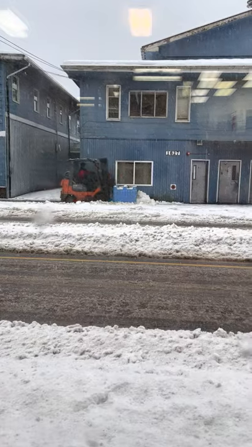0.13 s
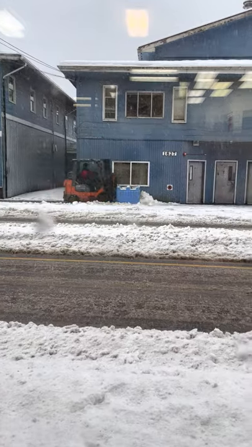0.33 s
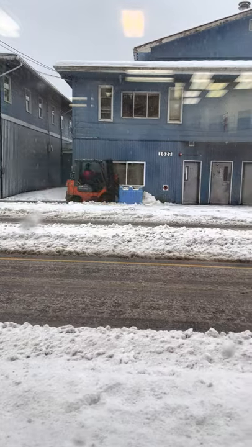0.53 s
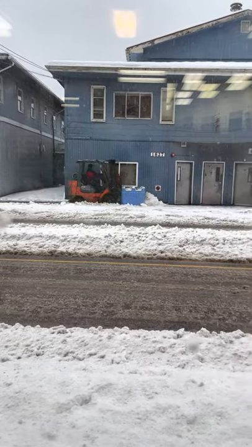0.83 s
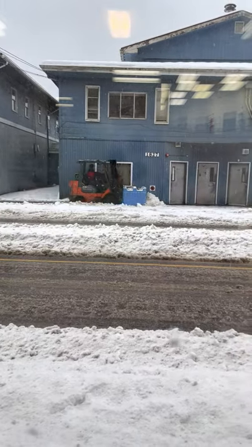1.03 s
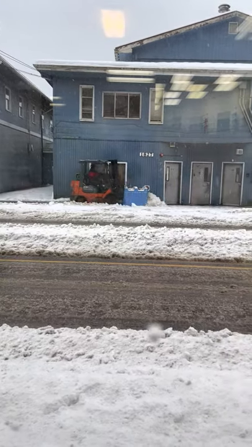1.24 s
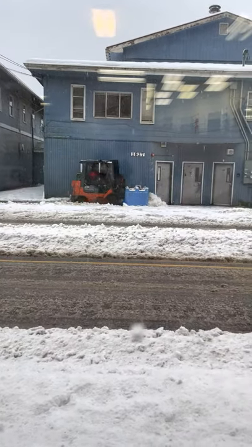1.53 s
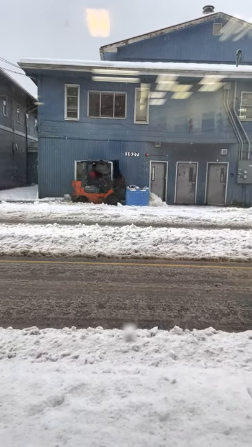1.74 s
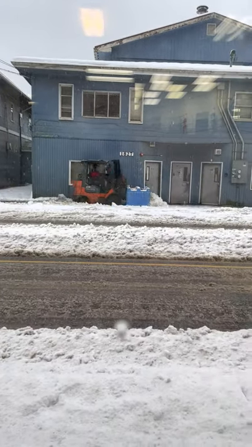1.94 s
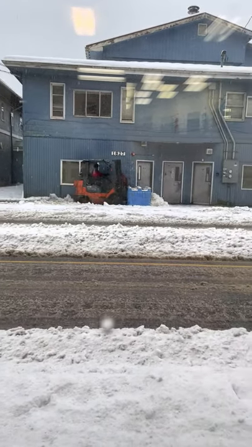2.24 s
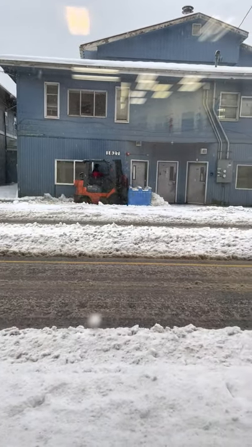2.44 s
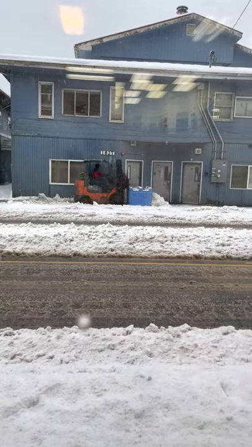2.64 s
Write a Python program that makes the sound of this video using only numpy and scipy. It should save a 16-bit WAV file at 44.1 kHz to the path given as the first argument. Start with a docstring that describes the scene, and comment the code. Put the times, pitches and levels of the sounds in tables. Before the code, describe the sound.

A forklift's low engine rumble throbs continuously outside, muffled by window glass, with faint dull bumps, wavering hums and thin airy hiss; a soft whine and hiss swell near the end, picked up by a handheld microphone indoors.

```python
"""Indoors at a window over a snowy street, where a forklift works its way across.
Its engine is a train of uneven firing pulses over a throbbing noise rumble; wavering sines make the hums,
the gliding growl and a late whine; bumps ring low damped modes.
Banded noise makes a thin hiss with a late swell and three faint swishes; narrow noise sings and ticks in it."""
import sys
import numpy as np
from scipy import signal
from scipy.fft import rfft, irfft, next_fast_len
from scipy.io import wavfile

SR = 44100
rng = np.random.default_rng(int(sys.argv[2]) if len(sys.argv) > 2 else 0)


def unload_wav(signal):
    """Save mono or channel-first audio to the path in sys.argv[1] as 16-bit WAV at rate SR, clipped to [-1, 1]."""
    wavfile.write(
        sys.argv[1],
        SR,
        np.round(np.clip(np.atleast_2d(signal).T, -1, 1) * 32767).astype(np.int16),
    )


N = 123039
T = np.arange(N) / SR


def from_db(db):
    """Decibels to amplitude gain."""
    return 10 ** (np.asarray(db) / 20)


def rms_one(x):
    """Scale to unit power."""
    return x / np.sqrt(np.mean(x ** 2) + 1e-20)


def in_time(rows, axis=1):
    """One column of a time table, joined by straight lines."""
    rows = np.array(rows)
    return np.interp(T, rows[:, 0], rows[:, axis])


def at_hz(points, hz):
    """Read a table on a log-frequency axis."""
    points = np.array(points)
    return np.interp(np.log(hz), np.log(points[:, 0]), points[:, 1])


def drift(rate_hz):
    """Slow random wander of spread 1: noise through a two-pole lowpass, run at every 40th sample."""
    step = 40
    pole = np.exp(-2 * np.pi * step * rate_hz / SR)
    noise = rng.standard_normal(N // step + 2002)
    slow = signal.lfilter([1], [1, -2 * pole, pole * pole], noise)[2000:]  # drop the filter's start-up
    slow = rms_one(slow - slow.mean())
    return np.interp(np.arange(N) / step, np.arange(len(slow)), slow)


def tone(hz):
    """A sine of rms 1 that follows a pitch curve."""
    cycles = np.cumsum(hz) / SR + rng.random()
    return np.sqrt(2) * np.sin(2 * np.pi * cycles)


def ring(x, hz, t60_s):
    """Two-pole resonance: a unit click sets a damped sine of height 1 ringing."""
    radius = np.exp(-np.log(1000) / (t60_s * SR))
    angle = 2 * np.pi * hz / SR
    return signal.lfilter([0, np.sin(angle)], [1, -2 * radius * np.cos(angle), radius ** 2], x + 1e-18)


def narrow_noise(hz, width_hz):
    """Noise twice through one resonance of the given width; rms 1."""
    t60_s = np.log(1000) / (np.pi * width_hz)
    once = ring(rng.standard_normal(N), hz, t60_s)
    return rms_one(ring(once, hz, t60_s))


def banded_noise(spectrum, patchy_db):
    """Third-octave bands of stereo noise, each with its own level, flicker and left-right likeness; rms 1."""
    # left-right correlation: hz, likeness (1 = identical)
    likeness = [(60, 1), (180, .9999), (350, .98), (700, 0.72), (1150, 0.62), (1800, 1), (3000, 0.52),
                (4500, 0.78), (6000, 0.91), (7600, 1), (9000, 1), (11000, 0.95)]
    edges_hz = 20 * 2 ** (np.arange(29) / 3)
    white = rng.standard_normal((2, 2, N))
    out = 0
    for k, (low, high) in enumerate(zip(edges_hz, edges_hz[1:])):
        if high < spectrum[0][0] or low > spectrum[-1][0]:
            continue
        centre_hz = np.sqrt(low * high)
        band = signal.butter(2, [low, high], "band", fs=SR, output="sos")
        mid, side = signal.sosfilt(band, white[k % 2])
        alike = 1 if centre_hz < 150 else np.clip(at_hz(likeness, centre_hz), -1, 1)
        gain = from_db(at_hz(spectrum, centre_hz) + patchy_db * drift(13.2))
        out = out + gain * (np.sqrt(1 + alike) * mid + np.sqrt(1 - alike) * side * [[1], [-1]])
    return rms_one(out)


def engine():
    """Firings are pressure pulses of uneven strength, all orders in step, over a rumble that throbs with them."""
    # engine speed and effort: start_s, firings_hz, relative_level_db
    running = [(.12, 52.5, -0.5), (.45, 52.6, -2.5), (.65, 52.8, 1.5), (.82, 51.3, -0.5), (.92, 50.8, -5),
               (1.2, 52.3, -3.5), (1.45, 52.9, 0), (1.72, 52.6, 1), (1.93, 52.4, -3.5), (2.2, 52.8, 0.5),
               (2.52, 52.6, -3.5), (2.79, 53, -1)]
    # engine drone: multiple of the firing rate, relative_level_db
    orders = [(1, -51.5), (2, -37.5), (3, -52), (4, -48), (5, -56), (6, -50), (8, -56.5), (10, -59.5),
              (12, -59.5), (14, -64)]
    # rumble colour through the glass: hz, relative_db_per_hz
    rumble_spectrum = [(20, -40), (30, -1), (45, -5.5), (62, 5), (90, -1), (115, -1.5), (180, -2.5),
                       (230, -5), (300, -7), (380, -12.5), (540, -12), (720, -19.5), (1100, -26),
                       (2000, -40)]
    # rumble level before the throb: start_s, level_db
    rumble_level = [(.12, -37.5), (.35, -37.5), (.75, -37.5), (1.05, -38), (1.4, -39), (2.0, -39),
                    (2.79, -39)]
    speed_wander, chug_depth = .0022, .12  # fractions
    engine_db, firing_spread_db, order_flutter_db = -1.5, 2.0, 1.1

    firing_hz = in_time(running) * (1 + speed_wander * drift(1.43))
    firings = np.cumsum(firing_hz) / SR + rng.random()
    firing_db = firing_spread_db * rng.standard_normal(200)
    uneven_db = np.interp(firings, np.arange(len(firing_db)), firing_db)
    strength = from_db(engine_db + in_time(running, axis=2) + uneven_db)

    pulses = 0
    for multiple, db in orders:
        order_gain = from_db(db + order_flutter_db * drift(3.8))
        pulses = pulses + order_gain * np.sqrt(2) * np.cos(2 * np.pi * multiple * firings)

    rumble = from_db(in_time(rumble_level)) * banded_noise(rumble_spectrum, patchy_db=0.5)
    throb = 1 + chug_depth * np.cos(2 * np.pi * firings)
    return strength * pulses + rumble * throb


def hums():
    """Sines that flutter, swell and sink as the machine drives on."""
    # hums: pitch_hz, flutter_db, level curve [(start_s, level_db), ..]
    hum_table = [(40.6, 1, [(.12, -44.5), (.3, -42), (.5, -38), (.62, -54), (2.79, -64)]),
                 (74.3, 1.5, [(.12, -39), (.32, -38.5), (.5, -45.5), (.8, -39.5), (1.2, -44.5), (1.8, -45),
                 (2.79, -40.5)]), (117.2, 1.4, [(.12, -46), (.58, -50), (.75, -39), (1.12, -50),
                 (1.28, -35), (1.43, -42.5), (1.66, -36.5), (2.1, -49.5), (2.28, -37), (2.52, -48.5),
                 (2.79, -39.5)]), (151.8, 0.84, [(.12, -48.5), (.9, -52), (1.5, -47.5), (2.05, -36),
                 (2.33, -47.5), (2.6, -36.5), (2.79, -52)]), (207.7, 1, [(.12, -57), (1.5, -48.5),
                 (1.72, -38.5), (2.0, -47.5), (2.17, -46.5), (2.35, -53), (2.7, -42)]), (220, 1, [(.9, -61),
                 (1.3, -44), (1.55, -40.5), (1.9, -52)]), (247.2, 1.2, [(.12, -44.5), (.7, -54.5),
                 (1.55, -53), (1.8, -43), (2.25, -46), (2.6, -41), (2.79, -44.5)]),
                 (493.7, 1.5, [(1.2, -69), (1.6, -56), (1.95, -50.5), (2.35, -59), (2.79, -56.5)]),
                 (863, 5, [(.12, -71), (2.15, -71), (2.4, -64.5), (2.79, -62)])]
    wander_hz = .7
    out = 0
    for hz, flutter_db, level in hum_table:
        gain = from_db(in_time(level) + flutter_db * drift(6.3))
        out = out + gain * tone(hz + wander_hz * drift(3.3))
    return out


def glides():
    """Strands of growl and whine: single wavering partials that swell, slide in pitch and fade."""
    # strands: start_s, end_s, start_hz, end_hz, level_db at mid-glide
    strands = [(0.114, 0.547, 148.4, 168, -45), (0.152, .55, 448.7, 520.5, -51.5),
               (0.251, 0.719, 509, 582.4, -54.5), (0.591, 0.997, 560, 522.5, -59),
               (0.619, .92, 309.2, 317.8, -48), (.7, 1.1, 739, 761, -57.5),
               (0.821, 1.298, 196, 220.3, -43.5), (0.847, 1.304, 140.3, 152.3, -44.5),
               (2.268, 2.617, 1020, 1009, -60), (2.329, 2.6, 990, 958, -59),
               (2.16, 2.37, 2138, 2020, -60.5)]
    flutter_db = 2
    out = 0
    for start, end, start_hz, end_hz, db in strands:
        way = np.clip((T - start) / (end - start), 0, 1)
        gain = from_db(db + flutter_db * drift(9.2)) * np.sin(np.pi * way)
        out = out + gain * tone(start_hz + (end_hz - start_hz) * way)
    return out


def whine():
    """High multiples of one spinning part, strongest late on, each with a fast rattle in its level."""
    # whole whine: start_s, level_db before the partials' own levels
    whine_level = [(2.1, -72), (2.26, -63.5), (2.55, -59), (2.68, -63), (2.79, -70)]
    # partials: multiple of the base pitch, relative_level_db
    partials = [(6, -3), (7, -17), (8, -1.5), (10, -1), (11, -4)]
    base_hz, wander_fraction, rattle_db = 247.2, .0025, 3
    hz = base_hz * (1 + wander_fraction * drift(7.6))
    out = 0
    for multiple, db in partials:
        out = out + from_db(db + rattle_db * drift(35)) * tone(multiple * hz)
    return from_db(in_time(whine_level)) * out


def bumps():
    """Each dull bump is a click that sets a few low, quickly damped modes ringing."""
    # clicks: start_s, level_db before the mode levels
    bump_table = [(.178, -28.5), (0.299, -30.5), (0.322, -27), (0.559, -30), (.627, -32), (.672, -32.5),
                  (0.809, -30), (.838, -31.5), (1.648, -29), (2.055, -32), (2.235, -31), (2.628, -29)]
    # modes: pitch_hz, relative_level_db, t60_s
    modes = [(74, -11, 0.054), (109.5, 3, 0.13), (164, -4, 0.073)]
    clicks = np.zeros(N)
    for s, db in bump_table:
        clicks[int(s * SR)] = from_db(db)
    return sum(from_db(db) * ring(clicks, hz, t60_s) for hz, db, t60_s in modes)


def swishes():
    """Bright banded noise that rises and dies away exponentially."""
    # swishes: peak_s, level_db, rise_s, decay_s
    swish_table = [(.78, -50.5, 0.052, 0.084), (2.285, -49, 0.017, 0.072), (2.636, -47, 0.022, 0.066)]
    # colour: hz, relative_db_per_hz
    swish_spectrum = [(2500, -28), (4500, -10), (5700, 1.5), (7500, -9), (9000, -3.5), (10400, 5),
                      (12000, 1.5)]
    level = 0
    for s, db, rise_s, decay_s in swish_table:
        level = level + from_db(db) * np.exp(-np.maximum((s - T) / rise_s, (T - s) / decay_s))
    return level * banded_noise(swish_spectrum, patchy_db=3.0)


def ticks():
    """Small high ticks: narrow noise that starts at once and dies quickly."""
    # ticks: start_s, level_db
    tick_table = [(0.302, -55), (.853, -61)]
    decay_s = 0.012
    level = 0
    for s, db in tick_table:
        level = level + from_db(db) * (T >= s) * np.exp(-np.abs(T - s) / decay_s)
    return level * narrow_noise(4000, width_hz=450)


def hiss():
    """Airy banded noise that sings thinly now and then, and a late swell with faint whistles in it."""
    # air colour: hz, relative_db_per_hz
    air_spectrum = [(500, 6.5), (1000, 0), (1500, 2.5), (2100, 2.5), (2800, -1), (3500, -5.5), (4600, -7.5),
                    (5600, -6), (6800, -11.5), (8200, -20.5), (9400, -3), (10400, -8), (11300, -6.5),
                    (12000, -17.5)]
    # air level: start_s, level_db
    air_level = [(.12, -46), (.28, -51), (.62, -51.5), (.7, -47.5), (.95, -50.5), (1.14, -52), (1.25, -49),
                 (1.5, -52), (2.0, -51.5), (2.79, -52)]
    # singing: middle_s, half_length_s (to 1/e), pitch_hz, resonance_width_hz, level_db
    singing_table = [(1.256, 0.18, 2100, 263, -57.5), (1.454, .1, 5290, 200, -64.5),
                     (1.69, 0.17, 6720, 402, -65)]
    # swell colour: hz, relative_db_per_hz
    swell_spectrum = [(600, 6), (1000, -1.5), (1500, -3.5), (2700, 2), (3600, 0.5), (4700, 1), (5800, -5.5),
                      (7500, -5), (9000, -9), (12000, -12)]
    # swell level: start_s, level_db
    swell_level = [(2.0, -67), (2.18, -53.5), (2.32, -47.5), (2.54, -47), (2.68, -49), (2.79, -52)]
    # whistles: pitch_hz, resonance_width_hz, level_db against the swell
    whistle_table = [(2025, 75, -11), (2830, 340, -12.5)]

    whistles = sum(from_db(db) * narrow_noise(hz, width_hz) for hz, width_hz, db in whistle_table)
    singing = 0
    for s, half_s, hz, width_hz, db in singing_table:
        envelope = from_db(db) * np.exp(-((T - s) / half_s) ** 2)
        singing = singing + envelope * narrow_noise(hz, width_hz)
    air = from_db(in_time(air_level)) * banded_noise(air_spectrum, patchy_db=1.5)
    swell = from_db(in_time(swell_level)) * (banded_noise(swell_spectrum, patchy_db=1.0) + whistles)
    return air + singing + swell


def scene():
    """Everything as it arrives behind the window."""
    return engine() + hums() + glides() + whine() + bumps() + swishes() + ticks() + hiss()


def record(dry):
    """Two microphone ports out of step in the treble, a low cut, a short silence at the start and a cut top."""
    # port phase: hz, radians by which left leads right
    port_phase = [(0, 0), (1700, 0), (2700, .7), (3900, .5), (4500, 1.6), (4900, 3.2), (5300, 5.2),
                  (5800, 6.28), (6250, 6.28), (7500, 8.0), (8700, 9.35), (9450, 9.45), (11000, 11.1),
                  (11900, 12.56)]
    start_s, end_fade_s = .1195, .004
    low_cut_hz, cutoff_hz = 20.6, 12600

    faded = dry * np.clip((T[-1] - T) / end_fade_s, 0, 1)
    size = next_fast_len(N + SR // 10)
    bins_hz = np.arange(size // 2 + 1) * SR / size
    lead = np.interp(bins_hz, *np.transpose(port_phase))
    turn = np.exp(.5j * lead * [[1], [-1]])  # half the lead to each side
    ports = irfft(rfft(faded, size) * turn, size)[:, :N]
    low_cut = signal.butter(6, low_cut_hz, "high", fs=SR, output="sos")
    ports = signal.sosfilt(low_cut, ports) * (T >= start_s)
    top_cut = signal.cheby2(14, 70, cutoff_hz, fs=SR, output="sos")
    return signal.sosfilt(top_cut, ports)


dry = scene()
out = record(dry)
unload_wav(out)
```